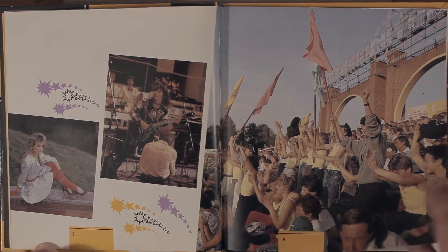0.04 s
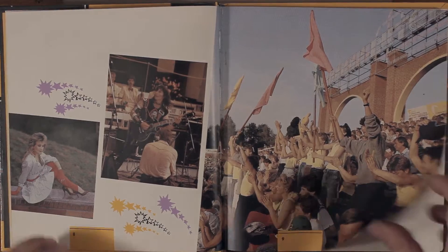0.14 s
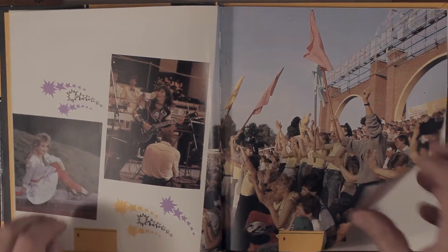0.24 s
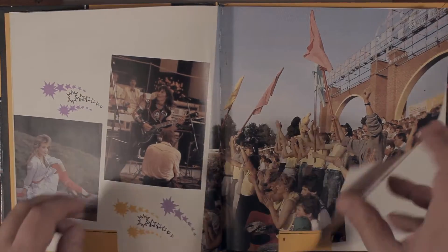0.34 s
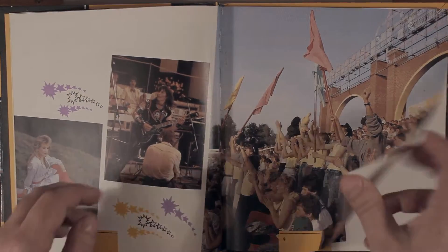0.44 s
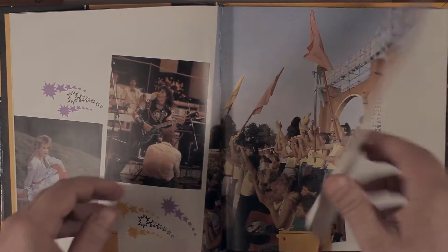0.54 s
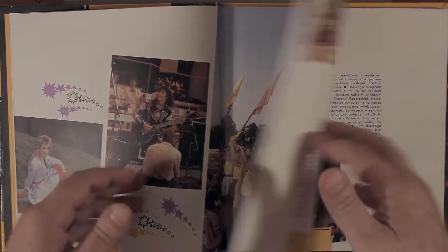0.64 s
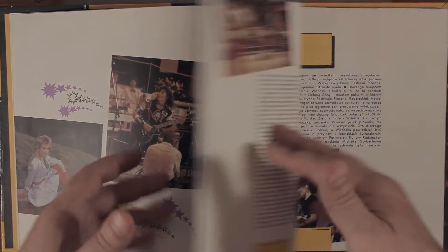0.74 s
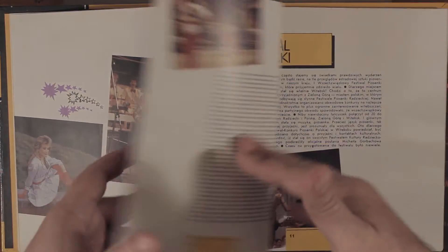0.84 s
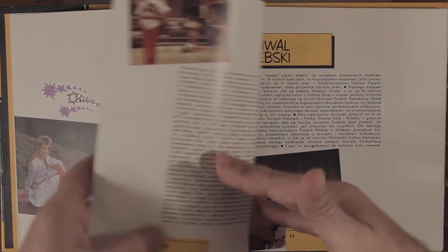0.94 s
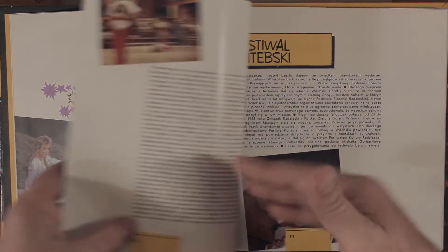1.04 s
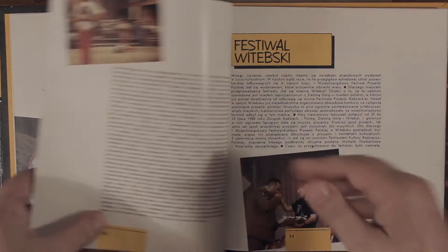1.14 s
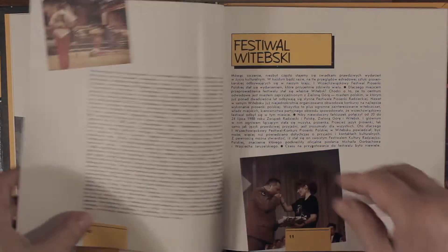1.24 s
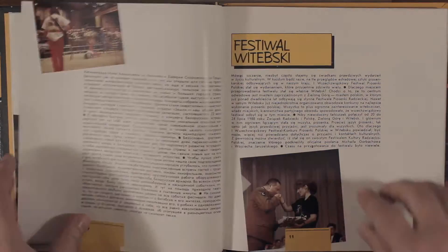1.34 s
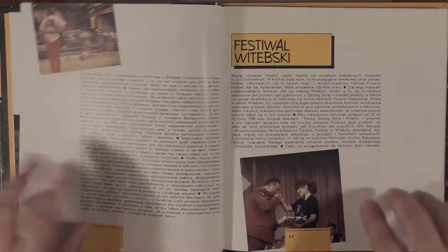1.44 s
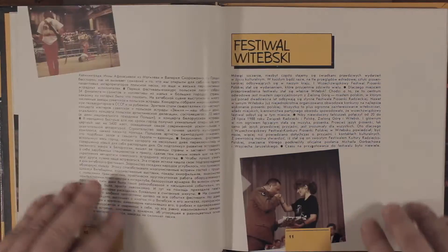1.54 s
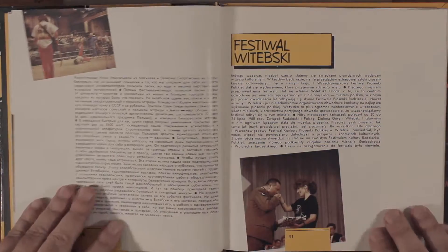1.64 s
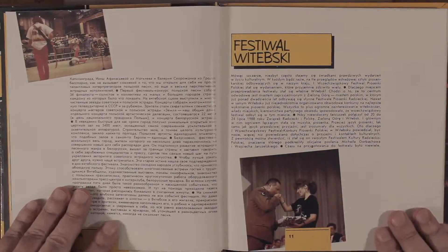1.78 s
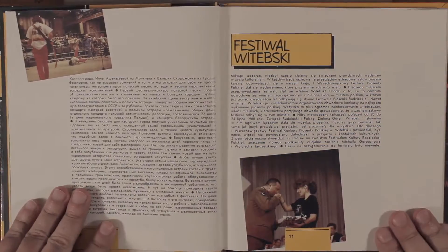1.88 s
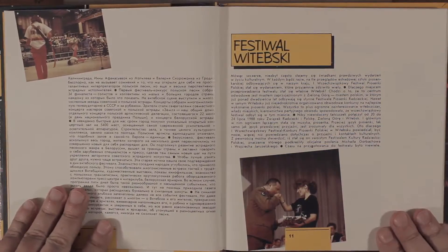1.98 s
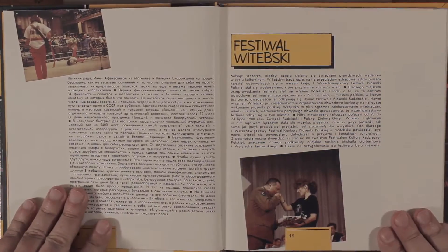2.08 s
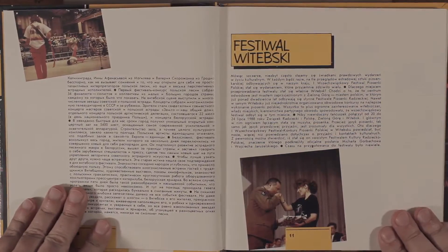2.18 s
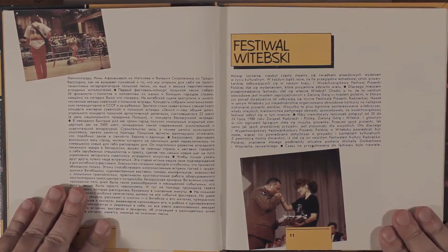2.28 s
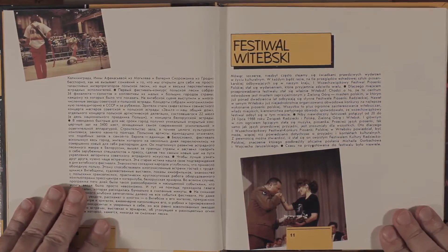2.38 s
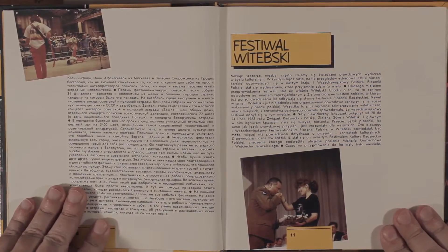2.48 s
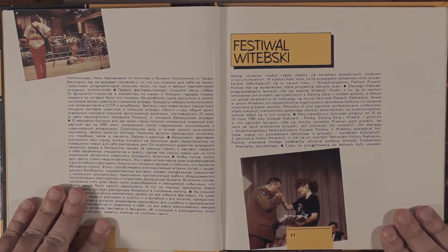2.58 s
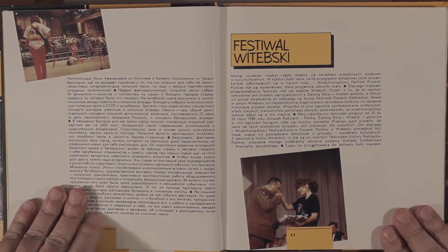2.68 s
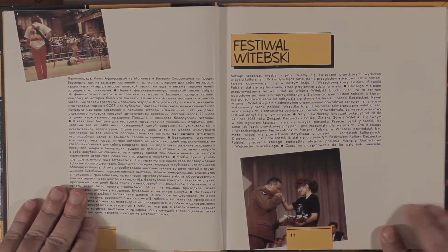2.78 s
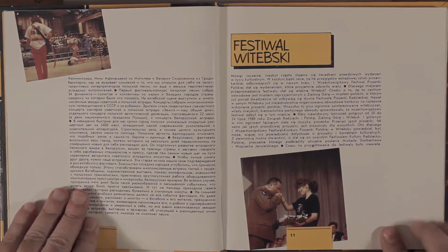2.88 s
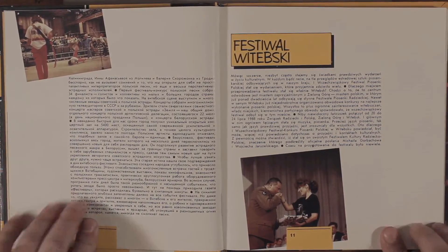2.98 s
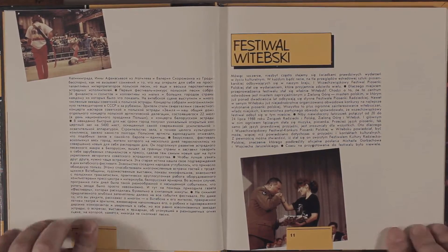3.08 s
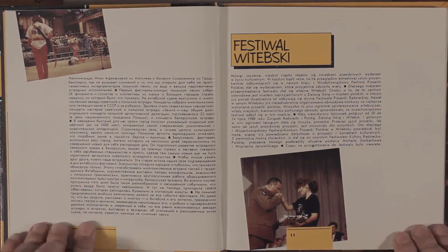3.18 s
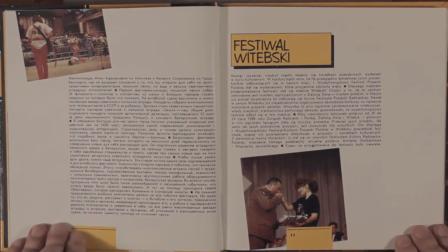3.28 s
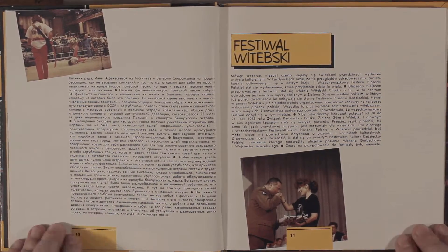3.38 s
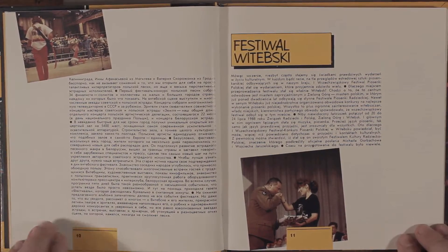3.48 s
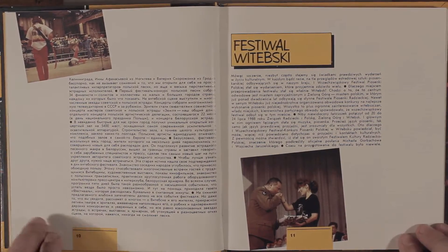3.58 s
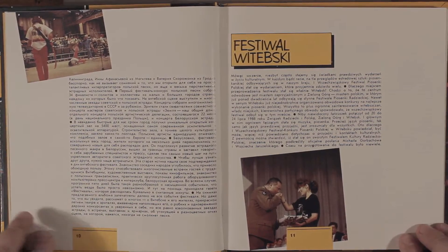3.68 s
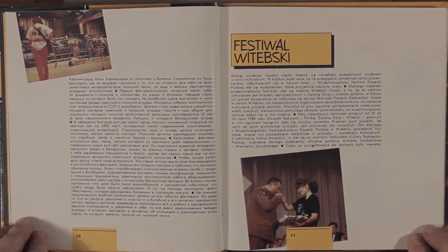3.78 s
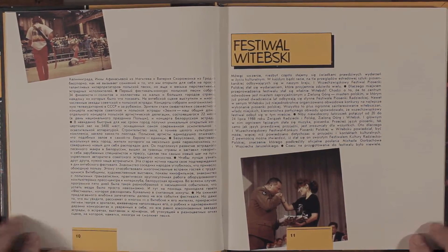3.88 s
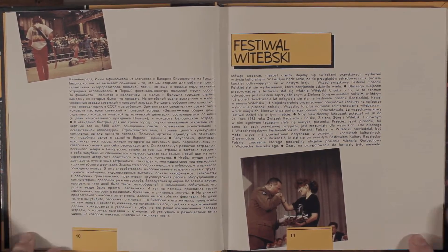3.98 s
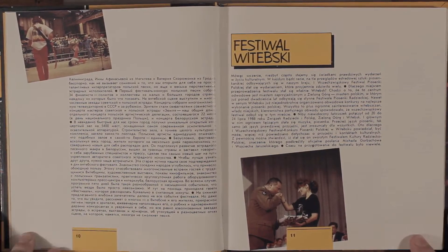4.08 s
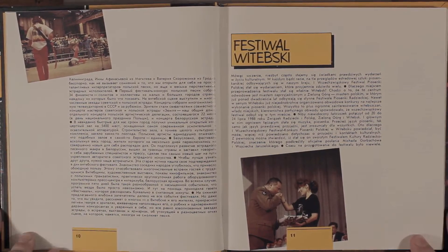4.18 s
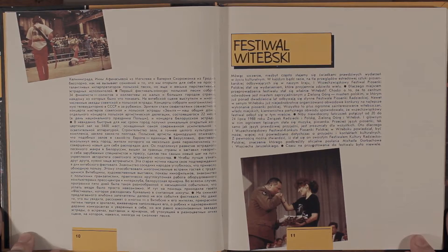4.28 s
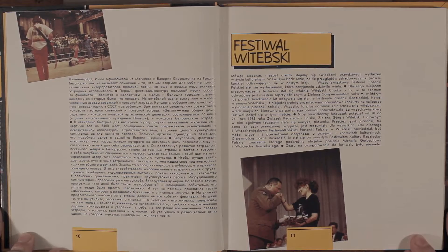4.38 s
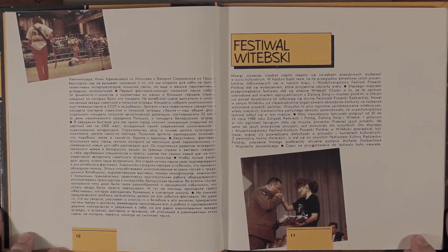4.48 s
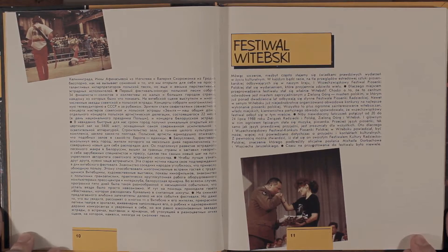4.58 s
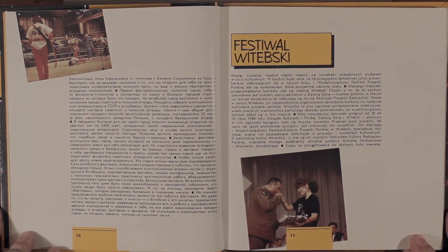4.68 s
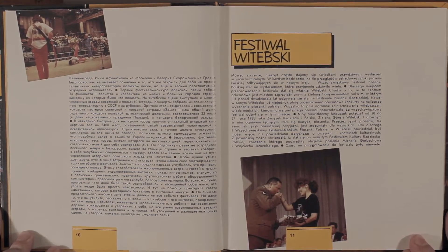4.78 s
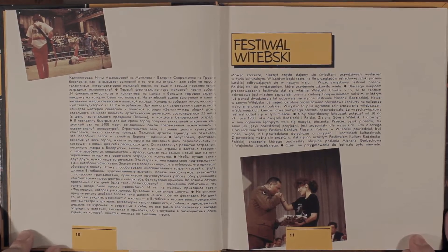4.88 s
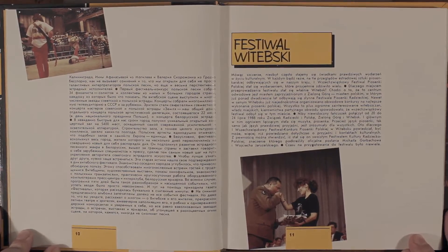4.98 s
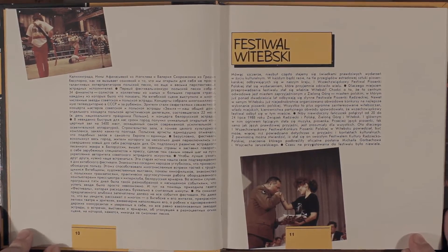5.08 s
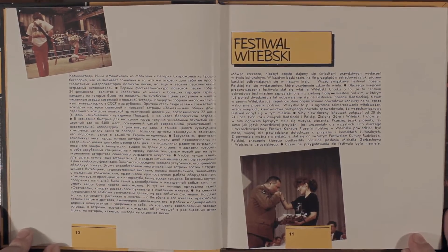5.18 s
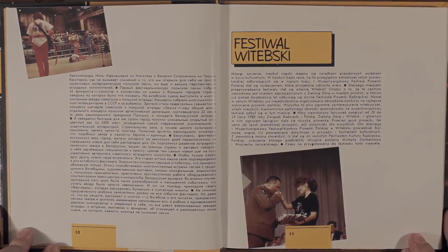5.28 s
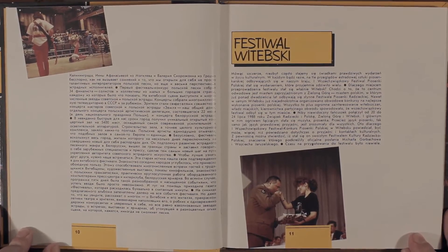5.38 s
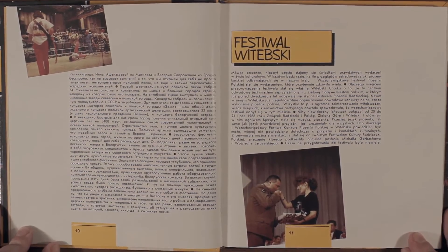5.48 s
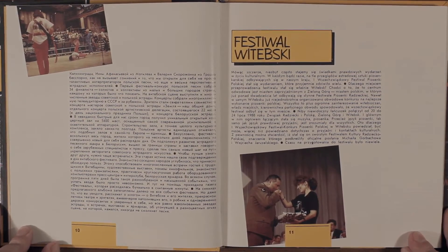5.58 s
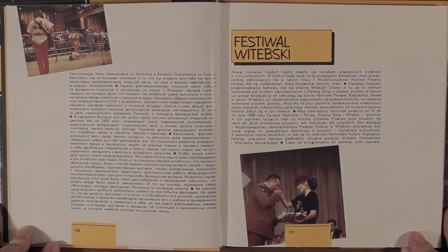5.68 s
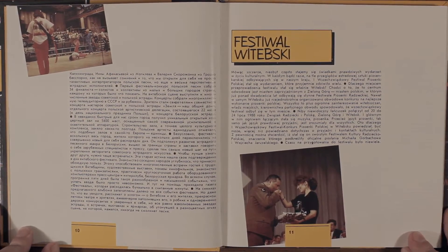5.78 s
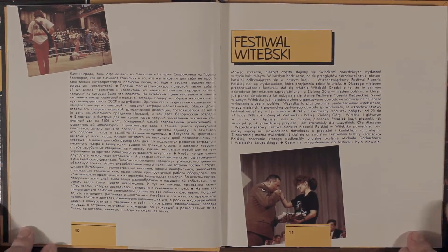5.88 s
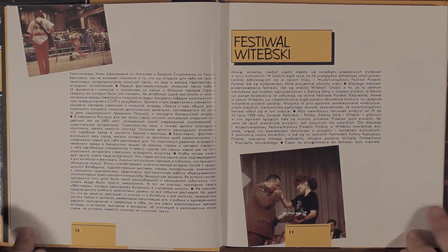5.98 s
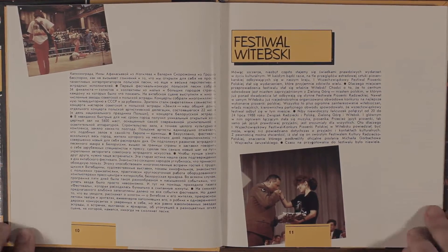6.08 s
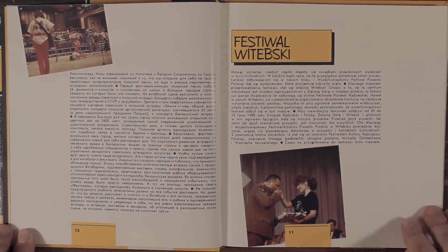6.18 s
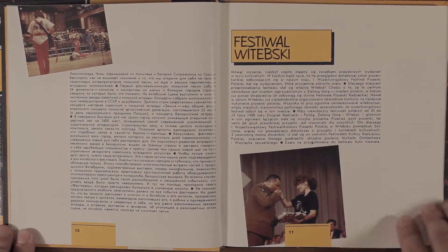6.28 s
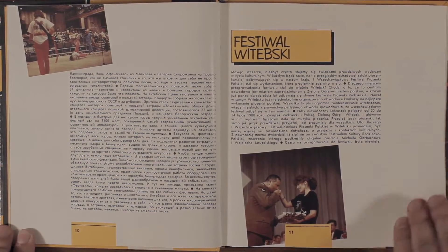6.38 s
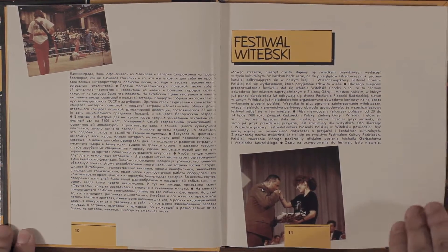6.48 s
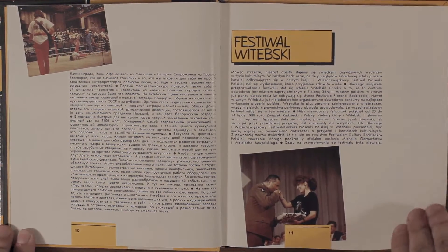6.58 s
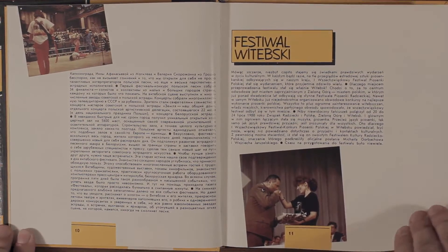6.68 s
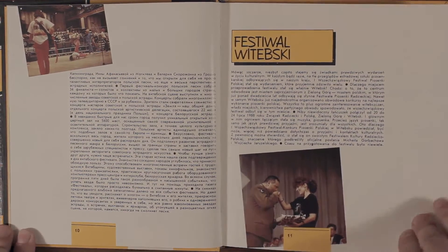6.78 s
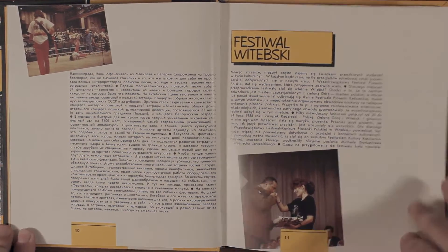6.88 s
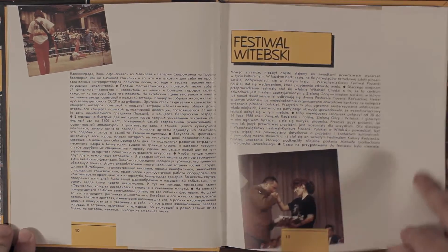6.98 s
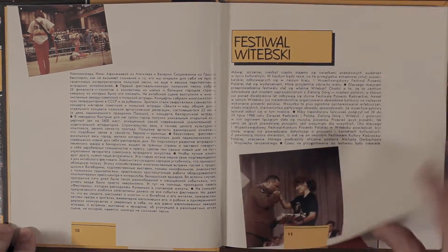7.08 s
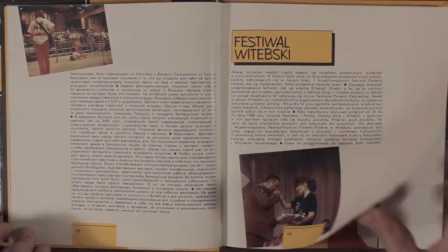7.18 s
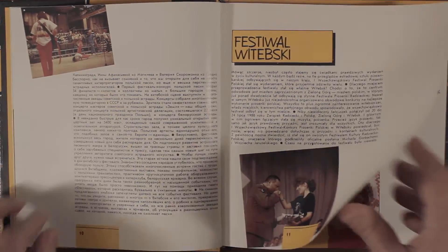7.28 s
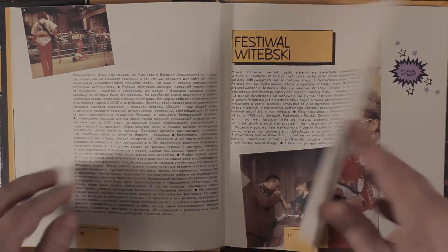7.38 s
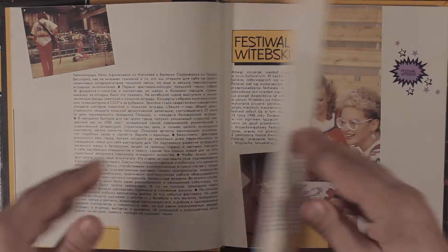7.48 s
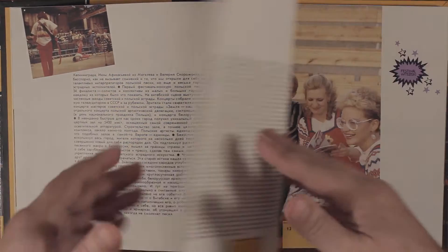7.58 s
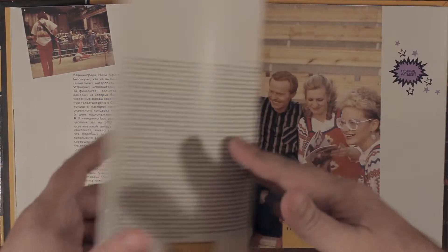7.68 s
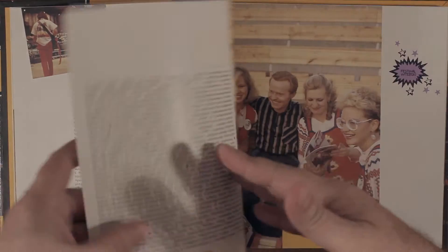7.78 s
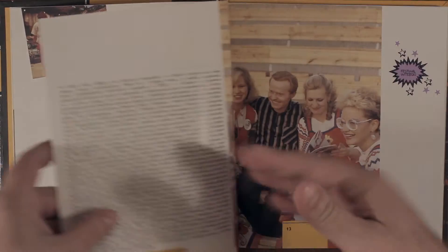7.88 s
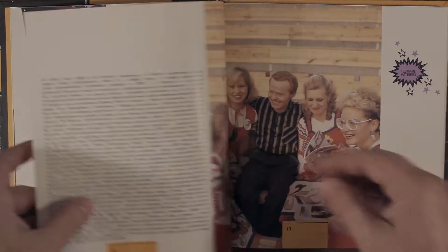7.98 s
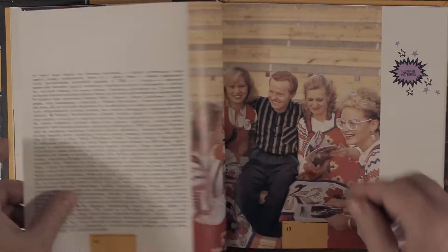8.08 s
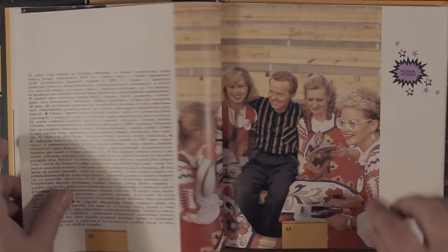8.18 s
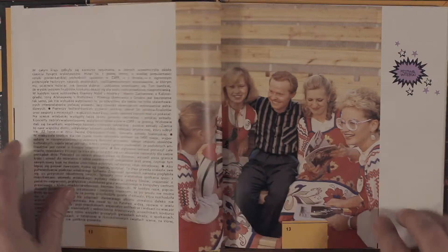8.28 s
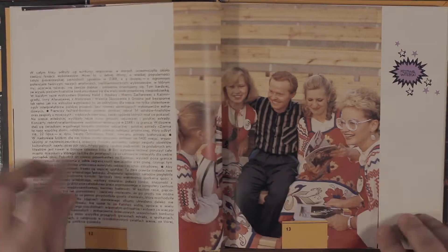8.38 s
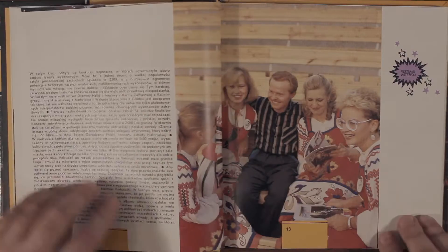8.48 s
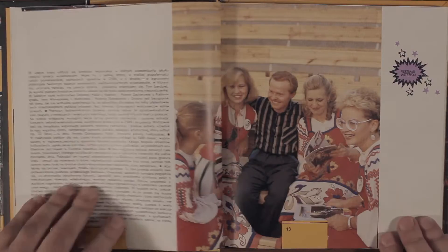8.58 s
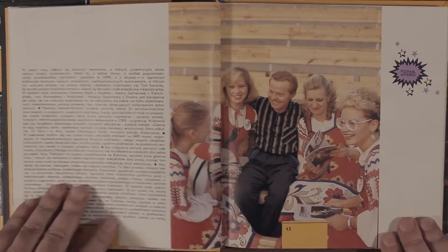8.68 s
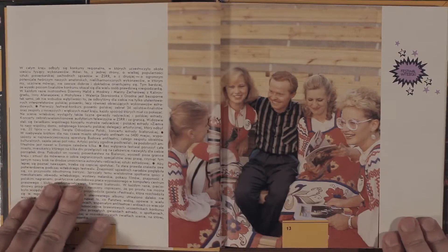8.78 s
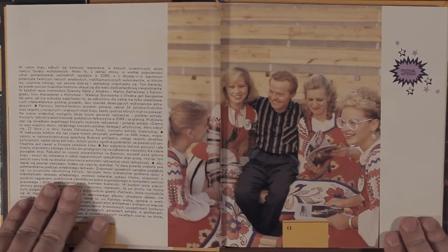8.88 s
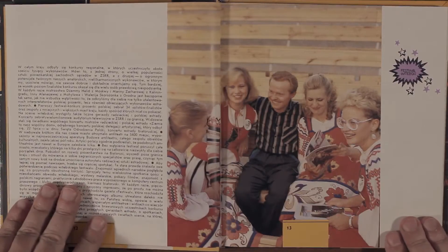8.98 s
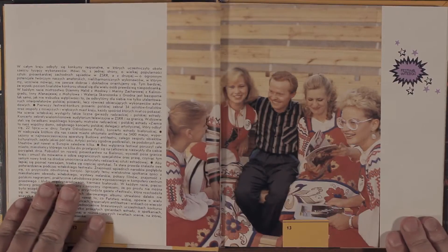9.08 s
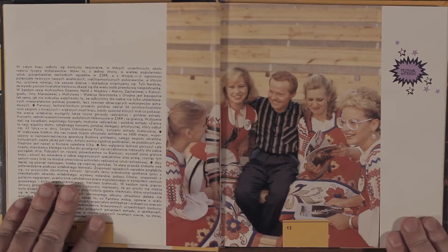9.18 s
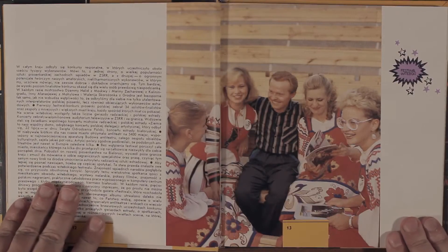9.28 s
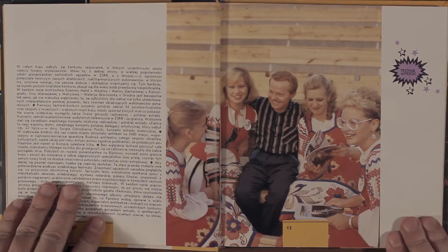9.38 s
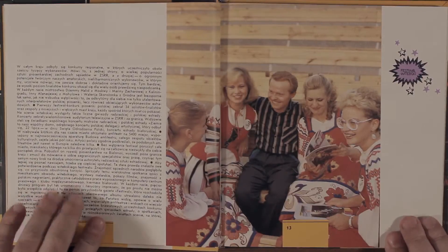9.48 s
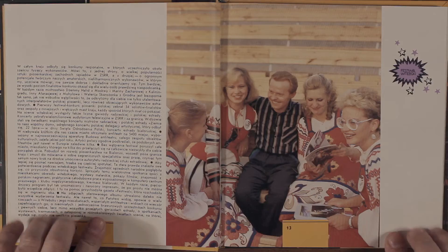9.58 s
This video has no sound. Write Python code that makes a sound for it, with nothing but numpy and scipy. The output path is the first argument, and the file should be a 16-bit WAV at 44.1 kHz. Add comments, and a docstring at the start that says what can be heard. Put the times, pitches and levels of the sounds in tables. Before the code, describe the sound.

Two heavy pages of a bound album are turned by hand, heard closely with short room reflections. The first snaps open abruptly, flaps and lands with a thin papery whistle. A long quiet stretch holds only dull finger knocks and low rubbing on the book. Then the second page buckles in a rapid run of loud pops, flaps over, lands and settles under the hand.

```python
"""In a small quiet room, two stiff pages of a bound album are turned by hand.
Each page peels off the stack, buckles with sharp snaps, flaps over, slides down and is smoothed flat.
Between the turns, fingertips knock and rub on the open book.
Snaps and knocks are pushed damped modes; flaps are noise in one low mode; scrapes, hiss and low
rustle are shaped friction noise; the squeak is a rising tone. Album and room add modes and echoes."""
import sys
import numpy as np
from scipy import signal
from scipy.fft import rfft, irfft, next_fast_len
from scipy.io import wavfile
from scipy.ndimage import map_coordinates

SR = 44100
rng = np.random.default_rng(int(sys.argv[2]) if len(sys.argv) > 2 else 0)


def master_out(mix):
    """Clip the mix to full scale and print it as 16-bit PCM to the path in sys.argv[1]."""
    frames = np.transpose(np.atleast_2d(mix))
    ceiling = np.clip(frames, -1, 1)
    pcm = np.round(ceiling * 32767).astype(np.int16)
    wavfile.write(sys.argv[1], SR, pcm)


N = 425565  # length in samples


def amp(db):
    """Level law: decibels to amplitude gain."""
    return 10 ** (np.asarray(db) / 20)


def unit(x):
    """Normalisation: scale to rms 1."""
    return x / np.sqrt(np.mean(x ** 2) + 1e-20)


def along(points, hz):
    """Interpolation: read (Hz, value) points on a logarithmic frequency axis."""
    f, v = np.transpose(points)
    return np.interp(np.log(hz + 1), np.log(f + 1), v)


def wobble(rate, size):
    """Random modulation: normal random knots, rate per second, joined by straight lines."""
    knots = rng.standard_normal(size // 20 + 4)
    return map_coordinates(knots, [np.arange(size) * rate / SR], order=1, mode="wrap")


def add(track, s, sound):
    """Superposition: mix a sound into the track at s seconds."""
    start = round(s * SR)
    part = sound[max(-start, 0):N - start]
    track[max(start, 0):][:len(part)] += part


def filtered(x, response):
    """Linear filtering: multiply the spectrum of x by a response of frequency."""
    m = next_fast_len(len(x) + 8192)  # padding holds the filter's ringing
    return irfft(rfft(x, m) * response(np.fft.rfftfreq(m, 1 / SR)), m)[:len(x)]


def coloured(x, spectrum):
    """Spectral shaping: x with a (Hz, dB) colour, at rms 1."""
    return unit(filtered(x, lambda f: amp(along(spectrum, f))))


def resonance(f, hz, q):
    """Damped oscillator: causal response of one mode."""
    return 1j * f * hz / q / (hz * hz - f * f + 1j * f * hz / q)


def pop(hz, q):
    """Impulse response: one push on a damped patch, a cycle or two with peak 1."""
    push = signal.unit_impulse(SR // 12)
    # the push takes time, so the top falls steeply
    contact = lambda f: 1 / (1 + 1j * f / (2 * hz) - (f / (2 * hz)) ** 2)
    wave = filtered(push, lambda f: resonance(f, hz, q) * contact(f) / (1 + .5j * f / hz))
    return wave / np.abs(wave).max()


def friction(grain_db, grain_rate, size):
    """Stick and slip: fibres catch and let go, as noise of randomly varying strength."""
    return unit(rng.standard_normal(size) * amp(grain_db * wobble(grain_rate, size)))


def stroke(t, rise, fall):
    """Envelope: gain peaks at t = 0, 20 dB down one rise before and one fall after."""
    return amp(-20 * np.minimum(np.where(t < 0, (t / rise) ** 2, t / fall), 10))


def strokes(rows, rise_share):
    """Envelope: summed strokes, each swelling for a share of its length and then fading."""
    t, share = np.arange(N) / SR, np.clip(rise_share, .1, .9)
    return sum(amp(db) * stroke(t - s, share * length, (1 - share) * length) for s, length, db in rows)


def scrape(rise, fall, hz, sweep, octaves, skirt=1.5):
    """Swept filtering: a second of friction, peaking mid-way, in an air wedge moving sweep octaves."""
    f, frames, z = signal.stft(friction(grain_db=2.5, grain_rate=500, size=SR), SR, nperseg=512)
    wedge = np.log2(hz) + sweep * np.clip(frames - .5, -rise, fall) / (rise + fall)
    colour = (1 + ((np.log2(f + 1)[:, None] - wedge) / octaves) ** 2) ** -skirt
    hiss = unit(signal.istft(z * colour, SR)[1][:SR])
    return hiss * stroke(np.arange(SR) / SR - .5, rise, fall)


# the bent sheet buckles: start_s [s], level_db of the pop before the bass leaks [dB],
# pitch_hz [Hz], edge_db relative to the pop [dB]
BUCKLES = [(0.2825, -11.5, 2460, -37), (0.2841, -9, 2660, -36), (0.2855, -15.5, 1970, -25),
           (0.4765, -25, 2330, -24), (.967, -32, 2500, -4), (1.0242, -18.5, 1510, -3.5),
           (1.0604, -27, 2970, -2), (1.6502, -34.5, 1380, 5.5), (5.9332, -29, 2100, -3.5),
           (6.6891, -10, 2290, -14), (6.7306, -8.5, 2450, -12.5), (6.7934, -4.5, 2300, -9),
           (6.8473, -11.5, 2090, -1), (6.8571, -9, 1830, -7), (6.9018, -15, 2040, -6.5),
           (7.018, -26.5, 2170, -7), (7.381, -23.5, 1740, -6), (7.887, -28.5, 1820, 1),
           (8.2595, -23, 1890, -8), (8.4493, -26, 2500, -5), (8.6054, -26.5, 1900, -1)]
# edge pitch of a 0 dB snap; weaker snaps come from smaller, higher creases
EDGE_HZ, EDGE_DB_PER_OCTAVE = 4240, 55


def snaps(q=1.18, edge_q=3.0, shiver_db=-13.0, shiver_t60=0.033, leak_hz=330):
    """Buckling: a pop with a crisp edge, then a brief shiver; the bass leaks round the sheet's rim."""
    out, t = np.zeros(N), np.arange(SR // 12) / SR
    for s, db, hz, edge_db in BUCKLES:
        edge = pop(EDGE_HZ * 2 ** (-db / EDGE_DB_PER_OCTAVE), edge_q)
        click = pop(hz, q) + amp(edge_db) * edge
        grains = friction(grain_db=1.5, grain_rate=450, size=2 * len(t))
        shiver = unit(signal.fftconvolve(grains, click, "valid")[:len(t)])
        add(out, s, amp(db) * (click + amp(shiver_db - 60 * t / shiver_t60) * shiver))
    return filtered(out, lambda f: resonance(f, leak_hz, 1) * 1j * f / leak_hz)


# the loose sheet flaps: start_s [s], level_db [dB], pitch_hz [Hz]
SHEET_FLAPS = [(0.279, -24.5, 1110), (.464, -37, 1290), (.868, -34.5, 950), (0.966, -43, 960),
               (1.027, -39, 790), (1.046, -31, 520), (1.059, -30.5, 980), (1.095, -41, 1050),
               (1.200, -38.5, 780), (6.794, -56, 560), (6.859, -39, 610), (7.382, -45, 960),
               (7.704, -44.5, 740), (7.777, -32.5, 1050), (7.888, -37, 890), (8.044, -39.5, 890),
               (8.052, -32.5, 1080), (8.063, -34, 560)]
# die-away of a flap of this pitch; the air brakes wider, lower flaps sooner
FLAP_T60_S, FLAP_HZ = 0.1, 1000


def flaps(q=2.1, attack=0.00047, dull_hz=2700, leak=0.41):
    """Bending: a wide area of sheet flips and flutters, as noise in one low, damped mode."""
    out, t = np.zeros(N), np.arange(SR // 4) / SR
    for s, db, hz in SHEET_FLAPS:
        # bass leaks round the sheet's edge
        radiated = lambda f: f * f / (f * f + (leak * hz) ** 2) / (1 + (f / dull_hz) ** 4)
        flutter = filtered(rng.standard_normal(len(t)), lambda f: resonance(f, hz, q) * radiated(f))
        swell = (1 - np.exp(-t / attack)) * amp(-60 * t / (FLAP_T60_S * hz / FLAP_HZ))
        swell_rms = np.sqrt(np.mean(swell ** 2)) / swell.max()
        add(out, s, amp(db) * unit(flutter * swell) * swell_rms)
    return out


# paper scrapes with falling pitch: one already fading as the sound begins, pages peeling and a finger reaching
# for the corner: peak_s [s], rise_s [s], fall_s [s], level_db [dB], pitch_hz at the peak [Hz], width of the
# resonance [octaves]
FALLING_SCRAPES = [(.004, .006, .047, -37, 1860, 0.97), (.131, .1, .39, -50, 2410, 0.77),
                   (.266, .093, 0.045, -41, 2000, 1.6), (.284, 0.0044, 0.0082, -17, 3060, 0.42),
                   (.286, 0.0082, 0.016, -36, 797, 0.088), (.305, 0.021, 0.056, -29, 2550, 0.6),
                   (.466, 0.003, 0.087, -33.5, 2480, 1.02), (.559, 0.15, 0.85, -52.5, 1900, 1.65),
                   (6.179, 0.05, 0.074, -58, 1170, 0.65), (6.586, 0.018, 0.025, -33.5, 3680, 0.31),
                   (6.613, 0.056, 0.048, -41, 2690, 1.07), (6.658, .02, 0.02, -40, 2400, 0.74),
                   (6.82, 0.11, .25, -43.5, 2100, 0.16), (7.006, 0.0053, 0.032, -37, 1540, .35),
                   (7.051, 0.28, .54, -52, 2460, 1.03)]
FALL_OCTAVES = 0.25  # fall of the pitch during a scrape


def falling_scrapes():
    """Swept friction: scrapes of falling pitch; under a peeling page the opening air wedge lowers it."""
    out = np.zeros(N)
    for s, rise, fall, db, hz, octaves in FALLING_SCRAPES:
        add(out, s - .5, amp(db) * scrape(rise, fall, hz, -FALL_OCTAVES, octaves))
    return out


# paper scrapes with rising pitch, page slides and a short edge flick: peak_s [s], length_s [s],
# level_db [dB], pitch_hz at the peak [Hz]
RISING_SCRAPES = [(1.278, 0.74, -51, 1520), (1.329, 0.051, -42, 2120), (1.366, 0.043, -45, 2600),
                  (1.394, 0.056, -41, 4400), (1.699, 0.25, -52.5, 1250), (2.303, .12, -58, 3480),
                  (7.792, 0.12, -53, 3980), (8.238, 0.078, -45, 2000), (8.268, 0.081, -39, 2300),
                  (8.457, 0.075, -46, 2100), (8.615, 0.085, -46, 1610), (8.681, 0.067, -48, 2580)]
RISE_OCTAVES = 0.84  # rise of the pitch during a scrape or flick


def rising_scrapes(rise_share=0.37, octaves=1.23):
    """Swept friction: scrapes of rising pitch; under a sliding page the closing air wedge raises it."""
    out = np.zeros(N)
    for s, length, db, hz in RISING_SCRAPES:
        rise, fall = rise_share * length, (1 - rise_share) * length
        add(out, s - .5, amp(db) * scrape(rise, fall, hz, RISE_OCTAVES, octaves))
    return out


# a page settles flat, also heard in glide(): touchdown_s [s], approach_s [s], level_db of the hiss [dB]
TOUCHDOWNS = [(1.443, 0.37, -46), (8.346, 0.24, -47.5)]


def flicks(over_db=8, rise=0.01, fall=0.011, hz=5700, octaves=1.0):
    """Short friction: a landing page's edge flicks over the stack, bright and over_db above its hiss."""
    out = np.zeros(N)
    for s, _, db in TOUCHDOWNS:
        add(out, s - .5, amp(db + over_db) * scrape(rise, fall, hz, RISE_OCTAVES, octaves))
    return out


# glossy paper glides under the hand: peak_s [s], length_s [s], level_db [dB]
HAND_GLIDES = [(.25, 0.099, -50), (.52, 0.28, -47), (1.15, 0.16, -58), (1.68, 0.33, -49),
               (2.02, 0.72, -55.5), (3.85, 0.63, -57), (7.75, 0.92, -56), (8.02, 0.28, -56.5),
               (8.68, 0.53, -51)]
# colour of the gloss hiss: frequency_hz [Hz], relative level_db [dB per Hz]
GLOSS_COLOUR = [(500, -9), (1200, 6), (3000, 2.5), (4200, 0.5), (5900, -0.5), (7200, -1), (8500, -3),
                (11500, -4), (15500, -2)]


def glide(crackle_rate=140, crackle_db=-7, stop_s=0.037, resting_db=-64):
    """Sliding friction: gloss hisses as it settles and is smoothed; single fibres tick in the hiss."""
    ticks = (rng.random(N) < crackle_rate / SR) * rng.standard_normal(N)
    hiss = friction(grain_db=1.0, grain_rate=260, size=N)
    t = np.arange(N) / SR
    settling = sum(amp(db) * stroke(t - s, approach, stop_s) for s, approach, db in TOUCHDOWNS)
    level = np.hypot(settling + strokes(HAND_GLIDES, rise_share=0.28), amp(resting_db))
    return level * coloured(hiss + amp(crackle_db) * unit(ticks), GLOSS_COLOUR)


# glossy paper whistles thinly: peak_s [s], length_s [s], level_db [dB]
THIN_WHISTLES = [(1.54, 0.24, -49), (1.67, 0.16, -54), (7.783, 0.031, -38.5), (8.01, 0.18, -58),
                 (8.68, .075, -44)]
# lines of the whistle: multiple of the lowest line [1], gain_db of the line [dB]
HARMONIC_LINES = [(1, -5), (2, 2), (3, -8), (4, -8)]
WHISTLE_HZ, WHISTLE_WIDTH_HZ = 2910, 1000  # lowest line; width of each resonance before squaring


def whistles(rise_share=0.27):
    """Stick and slip: fast uneven slips give a few fuzzy lines at multiples of one pitch."""
    def line(f, k):
        return resonance(f, k * WHISTLE_HZ, k * WHISTLE_HZ / WHISTLE_WIDTH_HZ) ** 2

    lines = lambda f: sum(amp(db) * line(f, k) for k, db in HARMONIC_LINES)
    return strokes(THIN_WHISTLES, rise_share) * unit(filtered(rng.standard_normal(N), lines))


# fingertips knock on the book: start_s [s], level_db of the thud [dB], pitch_hz [Hz],
# tick_db, gain of the nail relative to the thud [dB]
FINGER_KNOCKS = [(.282, -41, 198, -20), (2.052, -45.5, 600, 12), (2.192, -49, 121, -20),
                 (2.4932, -36, 820, 5.5), (2.692, -46.5, 140, 5), (2.775, -46, 149, 2),
                 (3.253, -51, 130, 15), (3.510, -42, 397, 13), (3.562, -45.5, 402, 12.5),
                 (3.666, -41.5, 393, 1), (3.903, -42, 150, 5), (4.631, -43.5, 420, 11.5),
                 (4.722, -45, 420, 5), (5.444, -45, 195, -12), (5.49, -46, 300, -14),
                 (5.612, -41.5, 415, -5), (5.691, -47.5, 375, -12), (5.937, -41, 425, 5),
                 (6.297, -40.5, 430, -20), (9.2, -37.5, 403, -11)]
NAIL_HZ, NAIL_EDGE_HZ = 1300, 3800  # the two pitches of a nail's tick


def knocks(q=1.8, nail_q=0.73, edge_db=-3):
    """Impact: soft fingertips thud on the stack of pages; the nail adds a tick."""
    out = np.zeros(N)
    tick = pop(NAIL_HZ, nail_q) + amp(edge_db) * pop(NAIL_EDGE_HZ, nail_q)
    for s, db, hz, tick_db in FINGER_KNOCKS:
        add(out, s, amp(db) * (pop(hz, q) + amp(tick_db) * tick))
    return out


# low rustle of handled paper, fingers rubbing and the low body under the second turn's snaps:
# peak_s [s], length_s [s], level_db before the common gain [dB]
LOW_RUSTLES = [(.03, 1, -48.5), (.8, 1, -65), (1.14, 0.5, -46.5), (2.02, .55, -52.5), (2.36, 0.55, -53.5),
               (2.95, 0.86, -51), (3.29, 0.22, -51.5), (3.56, 0.31, -48.5), (3.89, 0.44, -47),
               (4.05, 0.089, -50.5), (4.68, 0.51, -53), (5.17, 0.1, -56), (5.5, 0.22, -57),
               (6.22, .25, -53.5), (6.87, 0.65, -44), (7.96, 0.66, -47), (9.13, .75, -49.5)]
# colour of the low rustle: frequency_hz [Hz], relative level_db [dB per Hz]
RUSTLE_COLOUR = [(40, -25), (75, -20), (130, -2.5), (250, -4), (420, -2), (700, -5.5), (1200, -12),
                 (2500, -14.5), (6000, -25), (15000, -25)]


def low_rustle(level_db=-5, uneven_db=3, resting_db=-66):
    """Sliding friction: uneven low noise of handled paper, above a faint floor of resting skin."""
    drag = unit(amp(uneven_db * wobble(rate=35, size=N)))
    level = np.hypot(strokes(LOW_RUSTLES, rise_share=0.45), amp(resting_db))
    grains = friction(grain_db=5.0, grain_rate=250, size=N)
    return amp(level_db) * level * drag * coloured(grains, RUSTLE_COLOUR)


SQUEAK_S, SQUEAK_DB = 6.299, -38.5  # start and level of a fingertip's squeak on the gloss
SQUEAK_START_HZ, SQUEAK_END_HZ = 607, 880


def squeak(speed_up_s=0.0105, attack=.002, t60=0.13, jitter=0.04):
    """Stick and slip: skin slips at a nearly regular rate that climbs as the finger gets moving."""
    t = np.arange(SR // 6) / SR
    hz = SQUEAK_END_HZ + (SQUEAK_START_HZ - SQUEAK_END_HZ) * np.exp(-t / speed_up_s)
    phase = 2 * np.pi * np.cumsum(hz * (1 + jitter * wobble(rate=370, size=len(t)))) / SR
    envelope = amp(SQUEAK_DB - 60 * t / t60) * (1 - np.exp(-t / attack))
    out = np.zeros(N)
    add(out, SQUEAK_S, envelope * np.sin(phase))
    return out


# modes of the album lying on the table: pitch_hz [Hz], Q [1], gain_db [dB]
ALBUM_MODES = [(147.4, 32, 1), (406, 8, -4), (661, 15, -4), (1126, 24, -4)]


def album(x):
    """Modal resonance: the covers and the stack of pages add their few ringing modes."""
    modes = lambda f: sum(amp(db) * resonance(f, hz, q) for hz, q, db in ALBUM_MODES)
    return x + filtered(x, modes)


# die-away of the room: frequency_hz [Hz], t60_s [s]
ROOM_T60 = [(150, 0.33), (1000, 0.28), (3500, 0.22), (8000, 0.16), (15000, 0.17)]
# colour of the wall echoes: frequency_hz [Hz], relative level_db [dB]
WALL_COLOUR = [(100, -7), (500, 2.5), (2500, -2.5), (5000, 0), (9000, -7), (15000, -11)]


def room(x, wet_db=-5, gap=.003):
    """Reverberation: near walls answer within milliseconds, in a new echo pattern every 0.1 s."""
    out, hop = np.zeros(N), SR // 10
    for start in range(0, N, hop):
        f, t, z = signal.stft(rng.standard_normal(SR // 3), SR, nperseg=128)
        decay_db = -60 * t / along(ROOM_T60, f)[:, None]
        tail = signal.istft(z * amp(decay_db + along(WALL_COLOUR, f)[:, None]), SR)[1]
        power = np.mean(np.abs(rfft(tail, SR)[500:3000]) ** 2)  # bins are 1 Hz apart
        add(out, start / SR + gap, signal.fftconvolve(x[start:start + hop], tail / np.sqrt(power)))
    return amp(wet_db) * out


# colour of the quiet: frequency_hz [Hz], relative level_db [dB per Hz]
QUIET_COLOUR = [(20, -25), (50, -13), (110, -14), (160, -14), (195, -9.5), (240, -15), (420, -12.5),
                (800, -15), (2000, -20), (5000, -22.5), (9500, -28), (15800, -26.5)]


def background(level_db=-56.0):
    """Stationary noise: still air of the room and the microphone's even hiss."""
    return amp(level_db) * coloured(rng.standard_normal(N), QUIET_COLOUR)


def scene():
    """Superposition: snaps come straight from the lifted sheet, all other sounds through the album."""
    turning = flaps() + falling_scrapes() + rising_scrapes() + flicks() + glide() + whistles()
    handling = knocks() + low_rustle() + squeak()
    paper = snaps() + album(turning + handling)
    return (paper + room(paper) + background())[None]


def record(dry, top_hz=15950, offset=.001):
    """Band limiting: the recorder keeps nothing above top_hz and adds a slight constant offset."""
    return np.array([filtered(channel, lambda f: f < top_hz) for channel in dry]) + offset


dry = scene()
out = record(dry)
master_out(out)
```